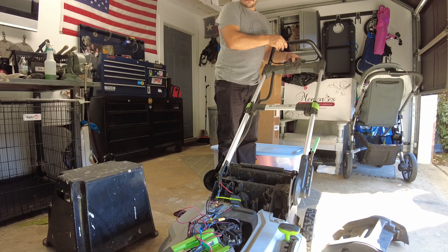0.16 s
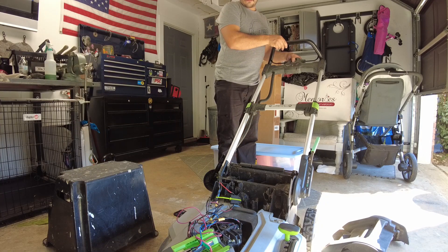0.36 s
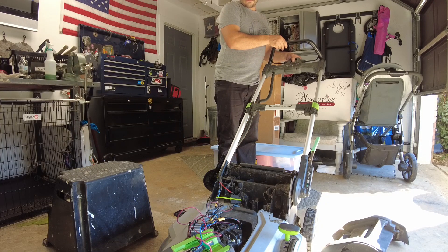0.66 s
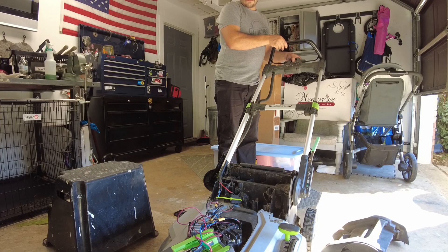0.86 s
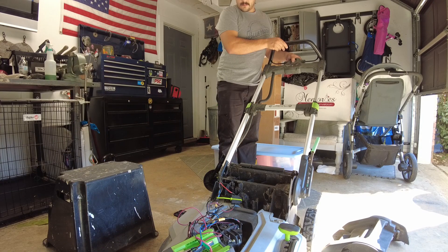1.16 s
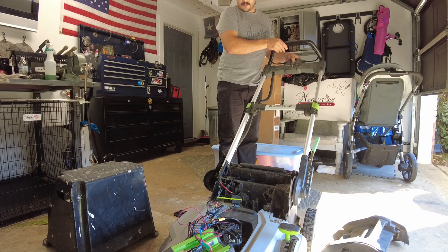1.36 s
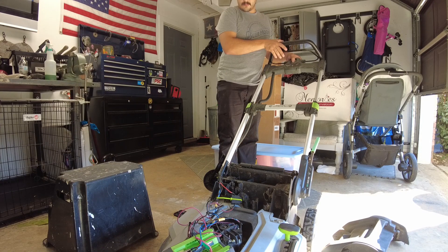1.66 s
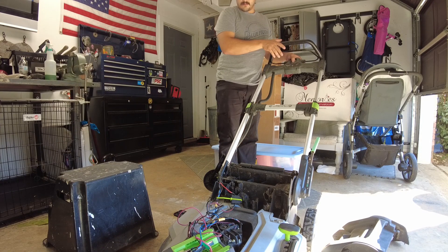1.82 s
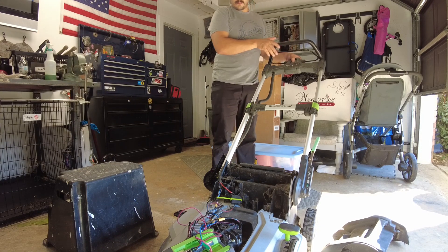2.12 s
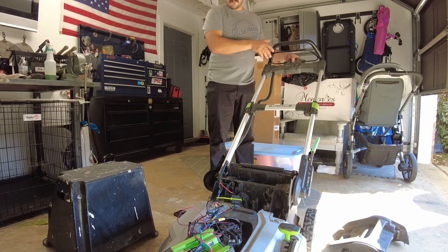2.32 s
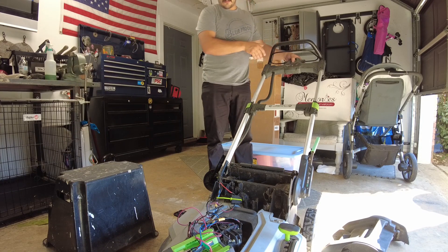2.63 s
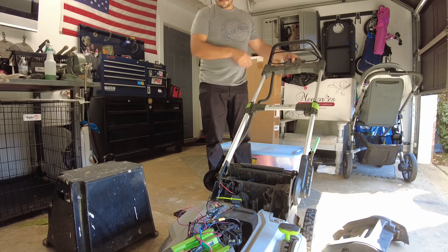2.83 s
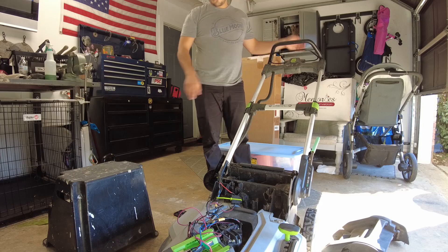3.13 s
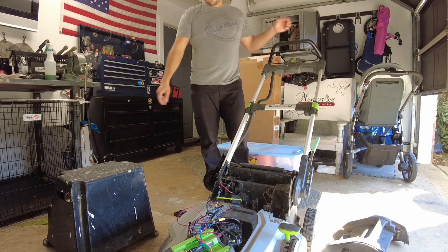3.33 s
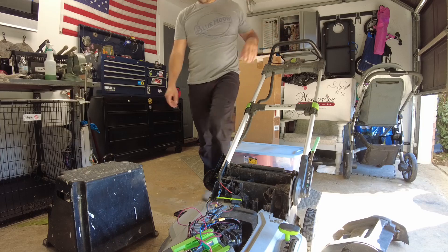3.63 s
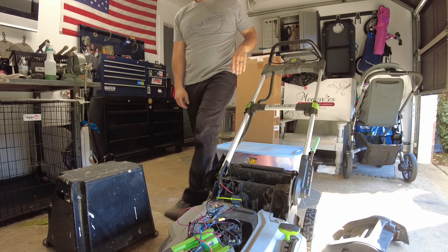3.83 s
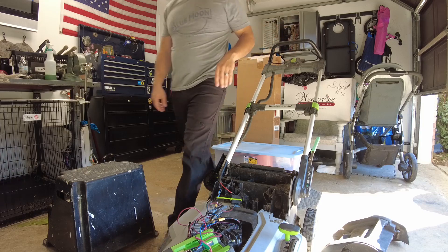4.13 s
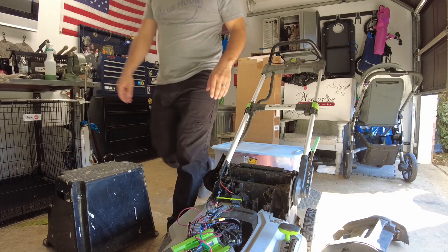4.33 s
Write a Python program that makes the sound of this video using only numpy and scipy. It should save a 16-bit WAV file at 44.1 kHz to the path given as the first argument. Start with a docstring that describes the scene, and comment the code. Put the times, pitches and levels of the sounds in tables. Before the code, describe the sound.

A cordless mower is already spinning up at the start, its electric whine rising and growing louder over a low blade drone and rushing air. At about 1.1 seconds there is a short low bump, and the pitch steps up and holds at full speed. At about 1.5 seconds the motor switches off with a brief, brighter puff of air. The rush dies away while the whine stands out, sliding down in pitch and fading until the blade rests at around 3 seconds. A faint, steady outdoor hum comes through the open door throughout and is left exposed as the mower stops. A very faint shoe scuff comes at about 3.7 seconds, a soft thudding footstep with a little grit on concrete at 4.1, and another light scuff at 4.4. The garage adds a short, mild reverberation.

```python
"""Battery mower in a garage

The mower spins up; at an edit cut the pitch steps up and holds; then the motor brakes the blade to rest.
The blade thumps and blows under the resonant deck; the motor sings on multiples of eight times the pass
rate through its ringing housing. An outdoor hum enters the open door; a shoe steps on the concrete."""
import sys
import numpy as np
from scipy import signal
from scipy.fft import rfft, irfft
from scipy.io import wavfile
from scipy.ndimage import uniform_filter1d

SR = 44100
rng = np.random.default_rng(int(sys.argv[2]) if len(sys.argv) > 2 else 0)


def pcm_store(signal):
    """Save signal as 16-bit PCM."""
    levels = np.round(np.clip(np.atleast_2d(signal), -1, 1) * 32767)
    wavfile.write(sys.argv[1], SR, levels.astype(np.int16).T)


N = 197479
T = np.arange(N) / SR
HZ = np.arange(N // 2 + 1) * SR / N
FULL_HZ, OFF_S = 91.1, 1.483  # blade passes per second at full speed, time of switch-off
CUT_S = 1.093  # edit cut: the pitch steps up abruptly, with a phase skip and a low bump


def undb(db):
    """Amplitude ratio: tenfold for every 20 dB."""
    return 10 ** (np.asarray(db) / 20)


def over_hz(table):
    """A spectrum interpolated on a log-frequency axis."""
    hz, value = np.transpose(table)
    return np.interp(np.log(HZ + 1), np.log(hz), value)


def unit(x):
    """Normalisation to rms 1."""
    return x / np.sqrt(np.mean(x ** 2))


def wander(rate_hz):
    """Slow random modulation: twice-smoothed random steps, spread near 1."""
    hold = int(SR / rate_hz)
    steps = np.repeat(rng.standard_normal(N // hold + 1), hold)
    return 1.47 * uniform_filter1d(uniform_filter1d(steps, hold), hold)[:N]


def wide_noise(gain):
    """Partial coherence: spectra of left and right noise, alike in the bass."""
    # Each row: frequency in Hz, left-right correlation.
    coherence = [(40, 1), (150, 0.92), (350, 0.85), (700, 0.079), (1400, 0.72), (3000, 0.5), (8000, 0.5),
                 (15000, 0.43)]
    alike = np.clip(over_hz(coherence), 0, 1)
    mid, side = rfft(rng.standard_normal((2, N)))
    return gain * (np.sqrt(1 + alike) * mid + np.sqrt(1 - alike) * side * np.array([[1], [-1]]))


def rotor_speed():
    """Spin-up, then exponential braking: pass rate in Hz and the share of the ramp's acceleration."""
    start_hz, ramp_hz_per_s, settle_hz, settle_s = 52.5, 44.5, 86.5, .235
    slow_s, drag_hz = .57, 3.5
    gap_hz = ramp_hz_per_s * settle_s
    knee_s = (settle_hz - gap_hz - start_hz) / ramp_hz_per_s
    effort = np.exp(-np.clip(T - knee_s, 0, None) / settle_s) * (T < CUT_S)
    rising = np.where(T < knee_s, start_hz + ramp_hz_per_s * T, settle_hz - gap_hz * effort)
    falling = (FULL_HZ + drag_hz) * np.exp(-np.clip(T - OFF_S, 0, None) / slow_s) - drag_hz
    return np.where(T < CUT_S, rising, np.clip(falling, 0, None)), effort


def deck(hz):
    """Resonance: the deck's modes add in power to the open path, giving an amplitude gain."""
    # Each row: frequency in Hz, bandwidth in Hz, peak in dB relative to the open path.
    modes = [(188, 26, 5.5), (246.6, 24, 16), (305, 25, 1), (340.3, 28, 11), (470, 29, 6.5),
             (600, 31, -0.5), (1058.5, 21.4, 8), (1219, 75, 4), (1322, 43, 1.5), (1476, 18, 3.5),
             (1640, 17, 7), (3130, 370, 4.5), (4400, 180, -2.5), (6020, 140, -6), (9100, 190, 1)]
    return np.sqrt(1 + sum(undb(2 * db) / (1 + (2 * (hz - f) / width) ** 2) for f, width, db in modes))


def blade(hz, passes, flutter_db=.4):
    """Periodic excitation: each tip passing the chute pushes a pulse of air."""
    # Each row: multiple of the pass rate, relative level in dB.
    harmonics = [(1, 5.5), (2, -1), (3, -8), (4, -14)]
    level = undb(-29 - .5 * (T < CUT_S)) * (hz / FULL_HZ) ** 3.2
    pulses = sum(undb(db + k * flutter_db * wander(14.93)) * deck(k * hz) * np.cos(2 * np.pi * k * passes)
                 for k, db in harmonics)
    return np.sqrt(2) * level * pulses


def motor(hz, passes, poles=8, waver_db=.8):
    """Forced vibration: magnets passing the slots, and rumbling bearings, shake the housing."""
    # Each row: multiple of eight times the pass rate, relative dB under power, relative dB in braking.
    harmonics = [(1, -3, 1), (2, -2, -6.5), (3, -8, -10), (4, -1, -7), (5, -6, -8), (6, -1.5, -12),
                 (7, -9, -11.5), (8, -6, -16), (9, -10, -16), (10, -8, -26), (11, -14, -28), (12, -13, -28),
                 (13, -12, -30)]
    rest_hz, fade_hz, dull_hz = 3, 17, 50
    fade = np.clip((hz - rest_hz) / (fade_hz - rest_hz), 0, 1)
    pull = undb(np.interp(T, (0, OFF_S, OFF_S + .35), (-33, -29.5, -24))) * fade
    braking = np.clip((T - 1.38) / .079, 0, 1)  # the timbre shifts just before switch-off
    whine = 0
    for k, power_db, brake_db in harmonics:
        db = power_db + braking * (brake_db - power_db) + waver_db * wander(18)
        dulling = np.minimum(hz / dull_hz, 1) ** (.2 * (k - 1))  # higher harmonics fade sooner
        whine += undb(db) * dulling * np.sin(2 * np.pi * (k * poles * passes + rng.random()))
    rumble = undb(-38) * (hz / FULL_HZ) ** .93 * rng.standard_normal(N)
    return housing(pull * whine + rumble)


def housing(force):
    """Modal superposition: modes ring on after a tone sweeps through; neighbours swing oppositely."""
    # Each row: frequency in Hz, width in Hz, peak gain in dB.
    modes = [(250, 36, 0), (298, 34, 5), (355, 60, -5), (420, 70, -8), (487, 30, -5), (605, 50, -2),
             (1240, 80, -10), (1430, 70, -2), (1620, 150, -8), (2880, 350, -4), (3120, 110, -4),
             (4000, 400, -8), (4550, 400, -7), (6400, 200, -2), (8000, 900, -12), (9400, 400, -11)]
    response = sum((-1) ** k * undb(db) / (1 + 1j * (HZ ** 2 - f ** 2) / (width * (HZ + 1))) ** 2
                   for k, (f, width, db) in enumerate(modes))
    return irfft(rfft(force) * response, N)


def air(hz, effort, passes, chop=.071, gust_db=.5):
    """Turbulence off the blade, coloured by the deck, chopped at each pass, brightened by the brake."""
    # Each row: frequency in Hz, relative spectral density in dB.
    spectrum = [(59, -16.5), (100, -21), (134, -16), (189, -17), (313, -16), (671, -6), (847, -9),
                (1210, -6.5), (2150, -18), (3150, -18.5), (6000, -25.5), (9000, -34.5), (12000, -41),
                (15700, -39)]
    # Each row, low band to high: gain in dB at full speed, speed exponent, gain in dB of a
    # slower-fading swirl, dB added on the ramp, dB scaling the brake's puff.
    band_laws = [(-43, 3.0, -22.5, 0, 3.5), (-21, 3.33, -56, 0.3, 1.7), (-18.5, 3.94, -30, -0.5, 4.5),
                 (-19, 2.8, -32, 2, 10)]
    noise = wide_noise(undb(over_hz(spectrum)) * deck(HZ) ** .91)
    low, mid, high = (1 / (1 + (HZ / split_hz) ** 6) for split_hz in (624, 2070, 8400))
    bands = [irfft(noise * part, N) for part in (low, mid - low, high - mid, 1 - high)]
    since_off = np.clip(T - OFF_S, 0, None)
    puff = np.clip(since_off / .036, 0, 1) * np.exp(-since_off / .16)
    speed = hz / FULL_HZ
    stream = 0
    for band, (db, exponent, swirl_db, ramp_db, brake_db) in zip(bands, band_laws):
        level = np.hypot(undb(db) * speed ** exponent, undb(swirl_db) * speed ** 1.345)
        stream += band * level * undb(ramp_db * effort + brake_db * puff + gust_db * wander(17.7))
    return stream / np.std(bands[1]) * (1 + chop * np.cos(2 * np.pi * passes))


def outdoor_hum(level_db=-45.5, swell_db=.4):
    """Ambient noise: a distant, almost steady hum enters by the open door."""
    # Each row: frequency in Hz, relative spectral density in dB.
    spectrum = [(15, -30), (30, -7.5), (116, -2), (156, -13.5), (228, -5.5), (290, -15), (480, -12.5),
                (620, -19), (950, -26.5), (1150, -21.5), (1260, -16), (2020, -25), (3380, -30),
                (7000, -41.5), (11000, -51), (15700, -48)]
    hum = irfft(wide_noise(undb(over_hz(spectrum))), N)
    return unit(hum) * undb(level_db + swell_db * wander(3.15))


def cut_bump(level_db=-17, width_s=.0056):
    """Transient: a Gaussian pulse at the edit cut, heard as a low bump."""
    return undb(level_db) * np.exp(-((T - CUT_S) / width_s) ** 2)


def shoe(knock_hz=585, knock_db=-18):
    """Impact and friction: heel and sole land with a damped thud and knock; grit scuffs underfoot."""
    # Each row: start in seconds, level in dB, frequency in Hz, 60 dB decay time in seconds.
    thuds = [(4.1385, -23, 215, .07), (4.1505, -25, 175, .04), (4.168, -33, 190, .16)]
    # Each row: start in seconds, level in dB, band frequency in Hz, rise time in seconds.
    scuffs = [(3.72, -62.5, 4400, .03), (4.14, -70, 11000, .025), (4.168, -51.5, 2800, .013),
              (4.44, -59, 3500, .02)]
    out = np.zeros(N)
    for start, db, hz, t60 in thuds:
        t = np.clip(T - start, 0, None)
        envelope = (1 - np.exp(-t / .001)) * np.exp(-np.log(1000) * t / t60)
        knock = undb(knock_db) * np.sin(2 * np.pi * knock_hz * t)
        out -= undb(db) * envelope * (np.sin(2 * np.pi * hz * t) + knock)
    for start, db, hz, rise in scuffs:
        t = np.clip(T - start, 0, None)
        band = signal.butter(2, (hz / 1.7, hz * 1.28), "band", fs=SR, output="sos")
        grit = unit(signal.sosfilt(band, rng.standard_normal(N)))
        out += undb(db) * grit * (t / rise) * np.exp(1 - t / rise)
    return out


def garage(direct, t60_s=.5, tail_db=-11):
    """Reverberation: a diffuse tail, thin in the bass and unlike on each side, joins the direct sound."""
    t = T[:int(SR * t60_s)]
    tail = rng.standard_normal((2, len(t))) * np.exp(-np.log(1000) * t / t60_s) * (t > .006)
    tail = signal.sosfilt(signal.butter(1, 300, "high", fs=SR, output="sos"), tail)
    tail /= np.sqrt(np.sum(tail ** 2, axis=1, keepdims=True))
    return direct + undb(tail_db) * signal.fftconvolve(direct[None], tail, axes=1)[:, :N]


def scene():
    """Superposition: blade, motor, bump and shoe reverberate; air and outdoor hum add directly."""
    hz, effort = rotor_speed()
    phase_skip = .2 * np.clip((T - CUT_S) / .0018, 0, 1)  # in cycles, at the edit cut
    passes = np.cumsum(hz) / SR - phase_skip
    reverberant = garage(blade(hz, passes) + motor(hz, passes) + cut_bump() + shoe())
    return reverberant + air(hz, effort, passes) + outdoor_hum()


def record(dry):
    """Band limiting: a steep low-pass removes the treble above 15750 Hz."""
    return signal.sosfilt(signal.ellip(10, .2, 80, 15750, fs=SR, output="sos"), dry)


dry = scene()
out = record(dry)
pcm_store(out)
```